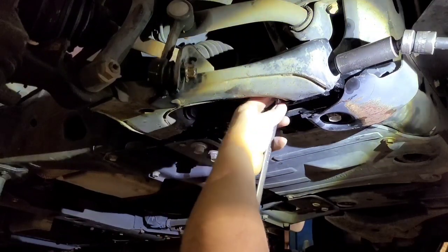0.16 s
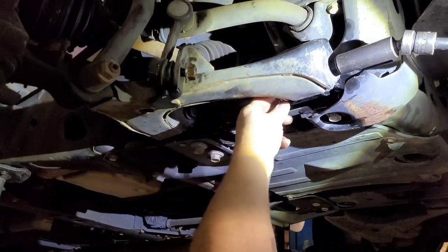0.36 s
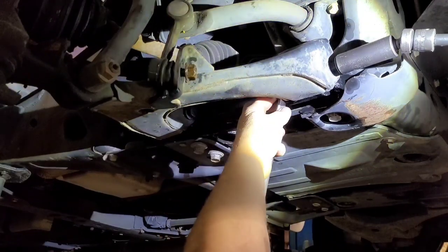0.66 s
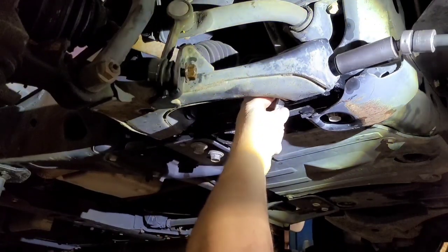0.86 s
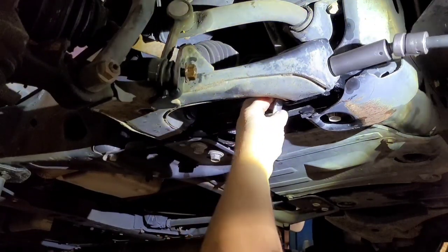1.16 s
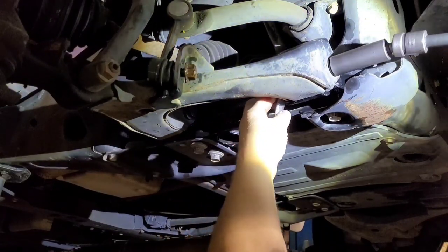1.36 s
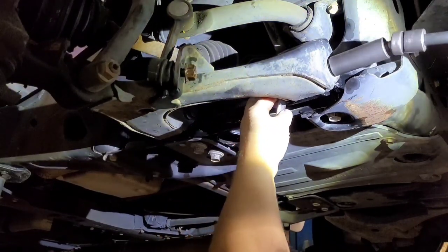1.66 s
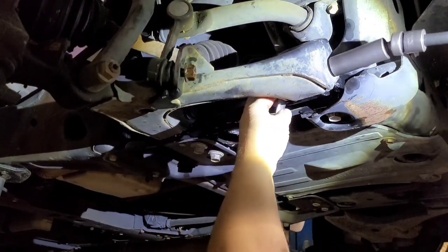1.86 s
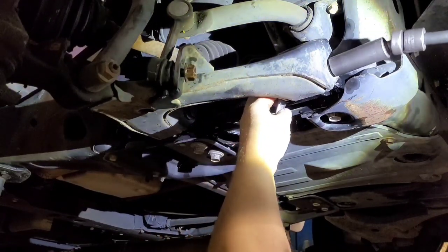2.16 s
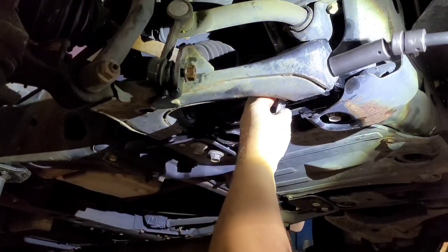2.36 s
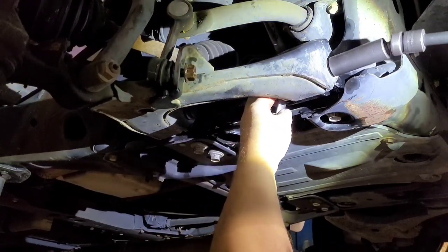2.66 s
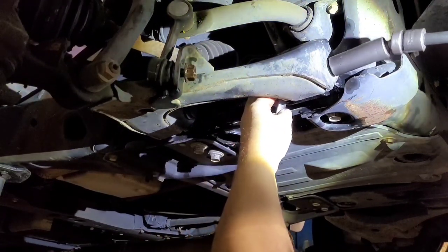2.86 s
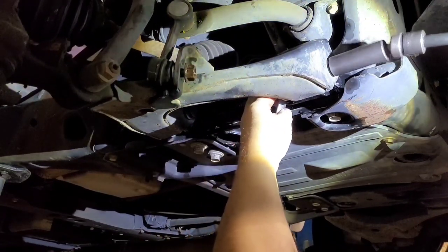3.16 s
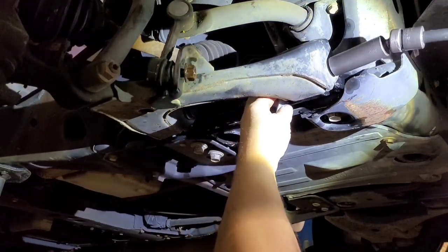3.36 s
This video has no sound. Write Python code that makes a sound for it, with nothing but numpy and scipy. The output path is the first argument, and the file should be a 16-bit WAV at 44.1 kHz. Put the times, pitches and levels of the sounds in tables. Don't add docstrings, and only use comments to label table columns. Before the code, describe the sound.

Pneumatic impact wrench rattles slowly, then fast, on steel in a garage, ending in a short echo.

```python
import sys
import numpy as np
from scipy import signal
from scipy.fft import rfft, irfft
from scipy.io import wavfile
from scipy.ndimage import uniform_filter1d

SR = 44100
rng = np.random.default_rng(int(sys.argv[2]) if len(sys.argv) > 2 else 0)


def output_pcm(signal):
    pcm = np.clip(np.atleast_2d(signal).T, -1, 1) * 32767
    wavfile.write(sys.argv[1], SR, np.round(pcm).astype(np.int16))


def invert_db(x):
    u = np.asarray(x, float) / 20
    return 10 ** u


N = 154350


def evened(x):
    return x / np.sqrt(np.mean(x ** 2) + 1e-20)


def read(points, hz):
    f, value = np.transpose(points)
    return np.interp(np.log(hz + 1), np.log(f + 1), value)


def follow(points):
    s, db = np.transpose(points)
    return invert_db(np.interp(np.arange(N) / SR, s, db, -140, -140))


def resonate(x, hz, width):
    pole = np.exp((2j * np.pi * hz - np.pi * width) / SR)
    return 2 * signal.lfilter([1 - abs(pole)], [1, -pole], x).real


def wobble(depth_db, samples):
    return invert_db(depth_db * evened(uniform_filter1d(rng.standard_normal(N), samples)))


# f/Hz, likeness/0..1
SAME = [(40, 0.58), (130, 0.75), (300, 0.6), (1200, 0.37), (3000, 0.13), (6000, 0.19), (15000, 0.088)]
# f/Hz, left minus right/dB
LEAN = [(60, 5), (180, 0.0), (550, -3), (1650, -3.5), (4970, 1.5), (15000, 3)]
LAG_S = 0.0003


def pair(colour):
    hz = np.fft.rfftfreq(N, 1 / SR)
    a, b = rfft(rng.standard_normal((2, N)))
    same = np.clip(read(SAME, hz), -1, 1)
    lean = invert_db(read(LEAN, hz) / 2)
    left = a * lean * np.exp(-2j * np.pi * hz * LAG_S)
    right = (same * a + np.sqrt(1 - same ** 2) * b) / lean
    z = np.array([left, right]) * invert_db(read(colour, hz))
    return z / np.sqrt(np.mean(irfft(z, N) ** 2))


# t/s, level/dB
SLOW = [(0.7195, -7.5), (0.7304, -18.5), (0.993, -7.5), (1.0005, -11.5), (1.038, -6.5), (1.0793, -5.5),
        (1.1228, -6.5), (1.1658, -6), (1.2102, -5), (1.2503, -10.5), (1.291, -5.5), (1.3344, -6),
        (1.3771, -7), (1.4189, -7.5), (1.4627, -7), (1.499, -7.5), (1.547, -6.5), (1.5837, -7),
        (1.6161, -6.5), (1.6505, -7.5), (2.8926, -8), (3.0252, -7), (3.2413, -6.5), (3.2694, -11.5),
        (3.2794, -15), (3.307, -14)]
# t/s, level/dB, brightness/dB
RUN = [(1.681, -2, -1.2), (1.7107, -4.5, -0.8), (1.7404, -8.5, 3), (1.7708, -2, 0.3), (1.7995, -4.5, 0),
       (1.828, -8.5, 0.3), (1.8579, -5, -0.5), (1.8864, -4.5, -0.5), (1.914, -3, -1.5), (1.9411, -7, 0.3),
       (1.9672, -5, -0.5), (1.9934, -5.5, -1), (2.021, -4.5, 2), (2.049, -3.5, -2.5), (2.0758, -6, -1),
       (2.1025, -7, -1.5), (2.1308, -6, -1), (2.1578, -6, -2.5), (2.186, -4, -1), (2.2127, -7, -1),
       (2.2395, -5, -1), (2.2662, -4.5, -0.5), (2.2927, -4.5, -1), (2.3191, -6.5, 0.3), (2.346, -5.5, 0.3),
       (2.372, -5.5, 1), (2.3985, -5, 1), (2.4254, -6.5, 1.5), (2.4517, -3.5, -1), (2.4775, -6, 1),
       (2.5034, -6, -3), (2.5301, -7.5, 0.3), (2.5571, -7, 0.3), (2.5828, -5.5, 0), (2.6091, -5, 0),
       (2.6347, -5.5, 0), (2.6604, -6, 0.3), (2.6856, -6.5, 0.5), (2.711, -4.5, 0), (2.7363, -4.5, -1.2),
       (2.7623, -5, 0), (2.7883, -6.5, 0.3), (2.8142, -5, 0.5), (2.8412, -5.5, -0.5), (2.8666, -4, 0.5),
       (2.9185, -4.5, 1), (2.9444, -5, 1.5), (2.9712, -4.5, -0.5), (2.9988, -5.5, -1.5), (3.0522, -5, 0.3),
       (3.0791, -5.5, 1), (3.1051, -5.5, 0.3), (3.132, -4, -0.5), (3.1596, -4, -0.5), (3.187, -6.5, 1),
       (3.2141, -5.5, -1)]
RUN_DB = -2


def blows():
    run_s, run_db, bright_db = np.transpose(RUN)
    slow_s, slow_db = np.transpose(SLOW)
    at = np.round(np.r_[slow_s, run_s] * SR).astype(int)
    return at, invert_db(np.r_[slow_db, run_db + RUN_DB]), np.r_[0 * slow_s, bright_db]


def struck(at, gains, shape):
    train = np.zeros((2, N))
    train[:, at] = gains
    return signal.oaconvolve(train, shape[None])[:, :N]


# f/Hz, level per Hz/dB
CRACK = [(100, -26), (500, -3), (1500, -9.5), (3100, -5), (6200, -12), (8000, -4.5), (10000, -6),
         (14000, -2)]
# f/Hz, fade time/s
CRACK_T60 = [(150, 0.11), (600, 0.053), (2000, 0.083), (5000, 0.071), (14000, 0.043)]
CRACK_DB, CRACK_RISE_S, CRACK_HOLD_S, LUMPS_DB = -4, 0.0009, 0.00047, 3.0
BASS_RISE_CYCLES = 2.2
COLOUR_SPREAD_DB, SIDE_SPREAD_DB = 1.8, 1.2
TIGHT_S, LOOSE_S, LOOSE_HOLD_S, LOOSE_TILT_DB = 2.6, 2.62, 0.0051, -3
SNAP, SNAP_S = 1.7, 0.0018


def crack(at, size, bright_db):
    z = pair(CRACK)
    hz, t = np.fft.rfftfreq(N, 1 / SR), np.arange(SR // 8) / SR
    centres = np.geomspace(150, 15000, num=10)
    loose = np.clip((at / SR - TIGHT_S) / (LOOSE_S - TIGHT_S), 0, 1)
    out = 0
    for k, f in enumerate(centres):
        band = np.sqrt(np.interp(np.log(hz + 1), np.log(centres), np.arange(len(centres)) == k))
        chance = rng.standard_normal((len(at), 3)).T
        colour_db = COLOUR_SPREAD_DB * chance[0] + bright_db * np.log2(f / 3000) / 2
        gains = size * invert_db(colour_db + SIDE_SPREAD_DB * chance[1:])
        rise = np.minimum(t / (CRACK_RISE_S + BASS_RISE_CYCLES / f), 1)
        fade_db_s = -60 / read(CRACK_T60, f)
        tight = rise * invert_db(fade_db_s * np.maximum(t - CRACK_HOLD_S, 0))
        tight = tight * (0.79 + SNAP * np.exp(-t / SNAP_S) * f / 20000)
        slack = rise * invert_db(fade_db_s * np.maximum(t - LOOSE_HOLD_S, 0))
        level = struck(at, gains * (1 - loose), tight)
        level = level + struck(at, gains * loose * invert_db(LOOSE_TILT_DB * f / 9900), slack)
        out = out + irfft(z * band, N) * level
    return invert_db(CRACK_DB) * out * wobble(LUMPS_DB, samples=30)


# f/Hz, level per Hz/dB
RATTLE = [(59, -33), (100, 12), (197, -18), (1280, 13.5), (1580, 5.5), (3120, 8.5), (6560, -27),
          (12900, -7), (16000, 4)]
RATTLE_DB, RATTLE_RISE_S, RATTLE_T60 = -20, 0.0052, 0.15


def rattle(at, size):
    t = np.arange(SR // 4) / SR
    shape = (1 - np.exp(-t / RATTLE_RISE_S)) * invert_db(-60 * t / RATTLE_T60)
    return invert_db(RATTLE_DB) * irfft(pair(RATTLE), N) * struck(at, size, shape) * wobble(3.0, samples=120)


# f/Hz, level per Hz/dB
BOOM = [(60, -19), (150, -6.5), (220, -1.5), (400, -3.5), (650, -2), (900, -7), (1500, -11), (16000, -54)]
BOOM_DB, BOOM_RISE_S, BOOM_T60 = -17.5, 0.03, 0.25


def boom(at, size):
    t = np.arange(SR // 2) / SR
    shape = (1 - np.exp(-t / BOOM_RISE_S)) * invert_db(-60 * t / BOOM_T60)
    return invert_db(BOOM_DB) * irfft(pair(BOOM), N) * struck(at, size, shape)


# f/Hz, fade
# time/s, level/dB, start t/s, end t/s
PARTS = [(180, 0.18, -13, 1.06, 1.806), (242.7, 0.26, -10, 1.264, 1.5), (306, 0.2, -14.5, 1.57, 2.1),
         (747, 0.7, -20, 3.22, 3.4), (660, 0.07, -8, 1.0, 1.36), (1183, 0.057, -3, 1.706, 2.3),
         (1320, 0.04, 1, 2.3, 2.64), (470, 0.12, -11, 2.62, 3.4), (568, 0.18, -6.5, 2.45, 3.4),
         (1738, 0.049, 1.5, 2.97, 3.4), (3000, 0.08, -1, 2.6, 3.4), (2610, 0.055, -14, 3.1, 3.4),
         (3924, 0.028, 3.5, 1.69, 1.78), (254, .55, -24, 3.2, 3.4),
         (470, 0.24, -11.5, .7, .74), (242, 0.29, -17, .7, .74), (783, 0.15, -7, .7, .74),
          (220, 1.3, -11, 3.22, 3.4), (303, .6, -18, 3.22, 3.4), (501, 0.54, -24, 3.22, 3.4),
          (1730, .06, -1.5, 2.63, 2.69), (183, 0.23, -13, 2.16, 2.24), (10960, .05, -11, 3.1, 4.1),
          (8200, .03, 3, 1.0, 1.6), (235, .2, -15, 1.7, 2.0), (500, .1, -8, 1.03, 1.14),
          (302, .15, -12, 1.08, 1.42), (190, .2, -13, 2.8, 3.05), (12800, .03, 0, 1.3, 2.3)]
PART_FADE_S, PART_RISE_S = 0.05, 0.00046
PART_SPREAD_DB, PART_ROUGH_DB = 2.0, 2.0


def parts(at, size):
    out = 0
    lag = LAG_S * np.array([[1], [0]])
    for hz, t60, db, start, end in PARTS:
        inside = np.minimum(at / SR - start, end - at / SR)
        load = np.clip(inside / PART_FADE_S + 1, 0, 1)
        chance = rng.standard_normal((len(at), 2)).T
        cycles = rng.random(len(at)) - hz * lag + 0.12 * chance[::-1]
        train = np.zeros((2, N), complex)
        level = invert_db(db - 11.5 + PART_SPREAD_DB * chance)
        train[:, at] = size * load * level * np.exp(2j * np.pi * cycles)
        pole = invert_db(-60 / t60 / SR) * np.exp(2j * np.pi * hz / SR)
        quick_pole = pole * np.exp(-1 / (PART_RISE_S * SR))
        ring = signal.lfilter([1], [1, -pole], train) - signal.lfilter([1], [1, -quick_pole], train)
        out = out + ring.real * wobble(PART_ROUGH_DB, samples=250)
    return out


SWAP_S, LEAD_S = 2.62, 0.00073


def change_sides(steel):
    swap = np.clip((np.arange(N) / SR - SWAP_S) / 0.02, 0, 1)
    early = np.roll(steel[0], -round(LEAD_S * SR))
    left = np.sqrt(1 - swap) * steel[0] + np.sqrt(swap) * early
    return np.array([left, steel[1]])


# t/s, level/dB
AIR = [(.64, -70), (.72, -38), (.85, -68), (.92, -37.5), (.98, -27), (1.1, -28.5), (2.6, -38), (3.3, -28.5),
       (3.38, -50), (3.5, -47.5)]
# f/Hz, level per Hz/dB
AIR_COLOUR = [(18, -44), (30, -5), (199, -0.5), (1350, 5), (1590, -3.5), (3060, 3), (5170, -11),
              (13000, -10), (16000, -24)]


def motor_air():
    return irfft(pair(AIR_COLOUR), N) * follow(AIR) * wobble(1.6, samples=300)


# t/s, level/dB
VALVE = [
    [(0.645, -79), (0.677, -47), (0.705, -48), (0.721, -43), (0.74, -56)],
    [(0.83, -66), (0.876, -41), (0.97, -35.5), (0.98, -48), (1.0, -41)],
]
VALVE_HZ, VALVE_WIDTH_HZ, VALVE_FLUTTER_DB = 3500, 420, 3


def valve():
    hiss = rng.standard_normal((2, N))
    once = resonate(hiss, VALVE_HZ, VALVE_WIDTH_HZ)
    whistle = evened(resonate(once, VALVE_HZ, VALVE_WIDTH_HZ))
    return whistle * sum(follow(part) for part in VALVE) * wobble(VALVE_FLUTTER_DB, samples=250)


# t/s, level/dB, length/s
PUFFS = [
    (1.397, -28.5, 0.034),
    (2.685, -27, 0.03),
    (2.748, -24, 0.039),
    (3.07, -30.5, .04),
]
PUFF_HZ = 48.5


def puffs():
    low = evened(resonate(rng.standard_normal((2, N)), PUFF_HZ, width=55))
    t = np.arange(N) / SR
    return low * sum(invert_db(db) * np.exp(-((t - s) / length * 2) ** 2) for s, db, length in PUFFS)


# t/s, level/dB
BLEED = [(3.25, -60), (3.33, -46), (3.4, -48), (3.5, -51)]
# f/Hz, level per Hz/dB
BLEED_COLOUR = [(500, -30), (3000, -2), (5500, 2), (12000, -2), (16000, -10)]


def bleed():
    return irfft(pair(BLEED_COLOUR), N) * follow(BLEED)


# t/s, level/dB, ring f/Hz, low ring of the arm level/dB
CLINKS = [(0.0487, -43.5, 1090, -5), (.0835, -46, 2840, -1), (.1372, -42, 2390, -9),
          (.150, -56.5, 2000, 17), (.258, -49, 880, -6), (.287, -50, 3000, -11), (.303, -43, 1090, -18),
          (.322, -51, 1440, -3), (.571, -48.5, 3500, -20), (.6535, -55, 3300, -16)]
# f/Hz, level per Hz/dB
SCRAPE = [(200, -26), (500, 7), (1100, 0), (2500, -7.5), (4500, -15), (8000, -30), (16000, -28)]
CLINK_T60, SCRAPE_T60, SCRAPE_DB = 0.037, 0.12, -3.5
ARM_HZ, ARM_T60, ARM_RISE_S, ARM_ROUGH_DB = 693, 0.16, 0.01, 5.5


def spanner():
    t, out = np.arange(SR // 4) / SR, np.zeros((2, N))
    scrape = irfft(pair(SCRAPE), N)
    rough = wobble(ARM_ROUGH_DB, samples=600)
    for s, db, hz, arm_db in CLINKS:
        at = round(s * SR)
        here = slice(at, at + len(t))
        ring = invert_db(-60 * t / CLINK_T60) * np.sin(2 * np.pi * (hz * t + rng.random((2, 1))))
        rub = scrape[:, here] * invert_db(SCRAPE_DB - 60 * t / SCRAPE_T60)
        arm = np.minimum(t / ARM_RISE_S, 1) * invert_db(arm_db - 60 * t / ARM_T60)
        arm = arm * np.sin(2 * np.pi * ARM_HZ * t)
        out[:, here] += invert_db(db) * (ring + rub + arm * rough[here])
    return out


# f/Hz, fade time/s
GARAGE = [(150, 0.93), (600, 0.42), (2500, 0.42), (12000, 0.27)]
GARAGE_DB = -7.5


def garage(x):
    flat = irfft(pair([(20, 0), (20000, 0)]), N)[:, :SR]
    hz, t, z = signal.stft(flat, SR, nperseg=256)
    fading = z * invert_db(-60 * t / read(GARAGE, hz)[:, None])
    tail = signal.istft(fading, SR, nperseg=256)[1]
    tail = tail * np.minimum(np.arange(tail.shape[1]) / (0.018 * SR), 1)
    tail = tail / np.linalg.norm(tail[0])
    return invert_db(GARAGE_DB) * signal.fftconvolve(x[:1], tail, axes=1)[:, :N]


# t/s, level/dB
RUMBLE = [(0, -74), (.15, -72), (.4, -64), (.5, -77)]
RUMBLE_HZ = 80


def rumble():
    once = resonate(rng.standard_normal((2, N)), RUMBLE_HZ, width=90)
    return evened(resonate(once, RUMBLE_HZ, width=90)) * follow(RUMBLE)


# f/Hz, level per Hz/dB
FLOOR = [(15, -41), (25, -13), (145, -9.5), (170, -12), (416, -23.5), (1290, -26.5), (4870, -39),
         (6050, -45), (12500, -28), (16000, -29)]
# f/Hz, width/Hz, level/dB
FLOOR_LINES = [(6100, 250, -74.5), (9160, 290, -70), (1340, 34, -72), (12800, 900, -66)]
FLOOR_DB = -54.5


def floor():
    hiss = rng.standard_normal((2, N))
    bands = sum(invert_db(db) * evened(resonate(hiss, hz, width)) for hz, width, db in FLOOR_LINES)
    return invert_db(FLOOR_DB) * irfft(pair(FLOOR), N) + bands


def scene():
    at, size, bright_db = blows()
    steel = crack(at, size, bright_db) + rattle(at, size) + boom(at, size) + parts(at, size)
    blown = motor_air() + valve() + puffs() + bleed()
    dry = change_sides(steel) + blown + spanner()
    return dry + garage(dry) + rumble() + floor()


def roll_off(x):
    return signal.sosfilt(signal.butter(12, 16830, fs=SR, output="sos"), x)


def record(dry):
    low_pass = signal.firwin(255, 15900, window=("kaiser", 5), fs=SR)
    cut = signal.oaconvolve(dry, low_pass[None], "same")
    mix = 1.086 * np.tanh(cut / 1.102)
    return roll_off(mix)


dry = scene()
out = record(dry)
output_pcm(out)
```